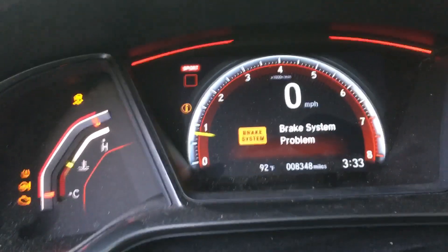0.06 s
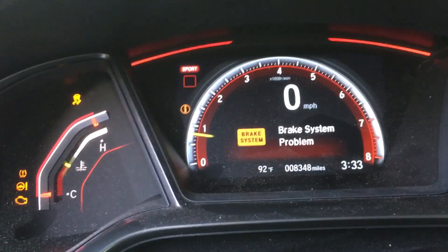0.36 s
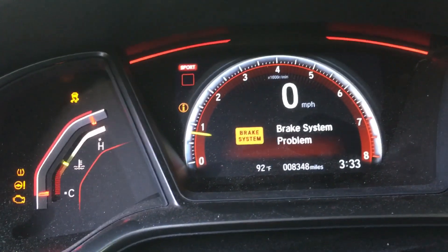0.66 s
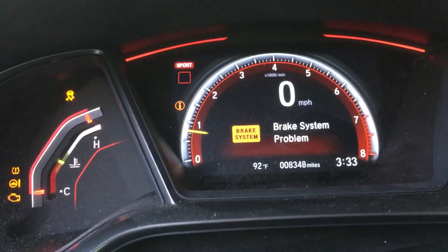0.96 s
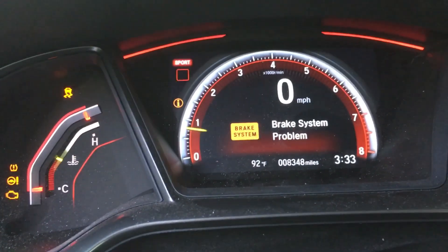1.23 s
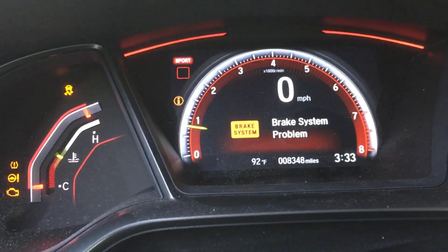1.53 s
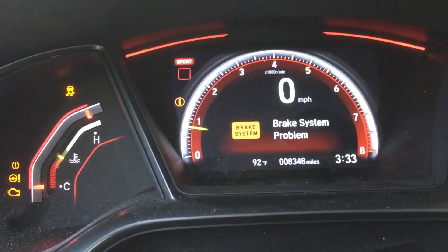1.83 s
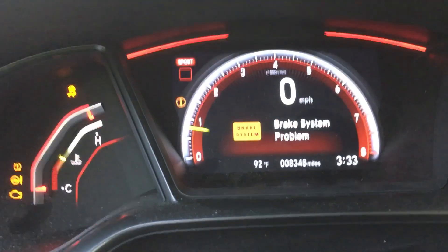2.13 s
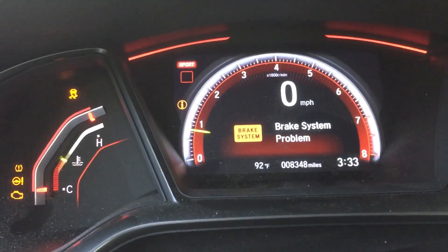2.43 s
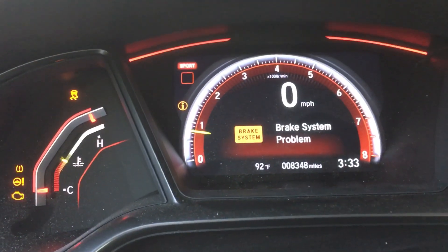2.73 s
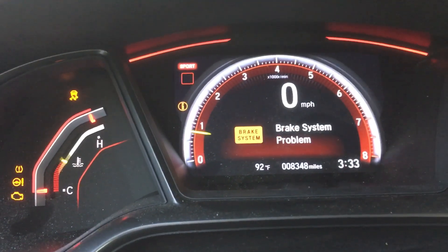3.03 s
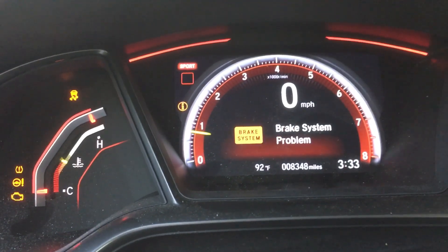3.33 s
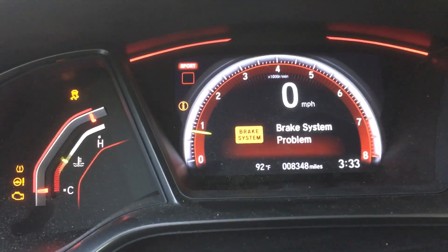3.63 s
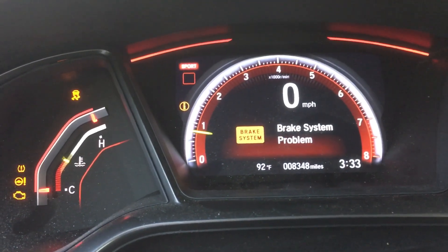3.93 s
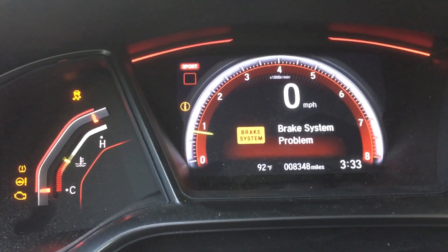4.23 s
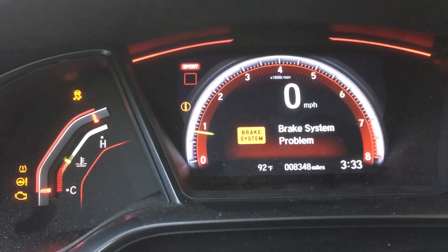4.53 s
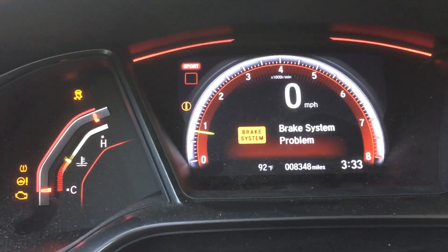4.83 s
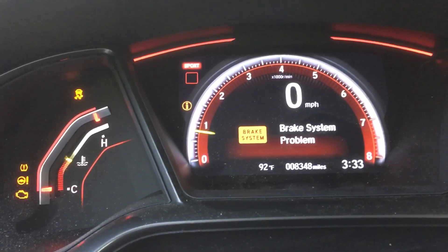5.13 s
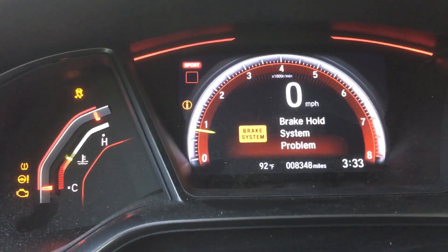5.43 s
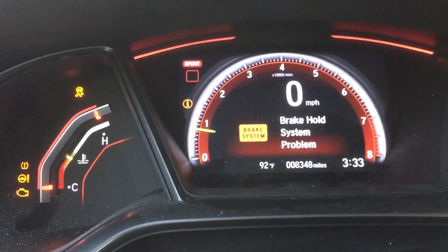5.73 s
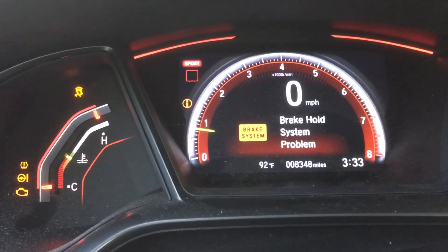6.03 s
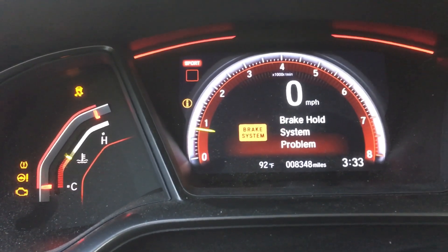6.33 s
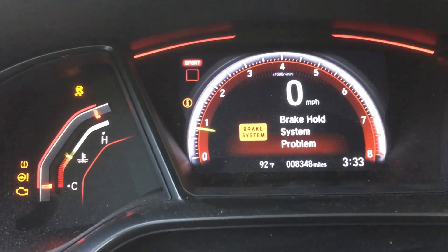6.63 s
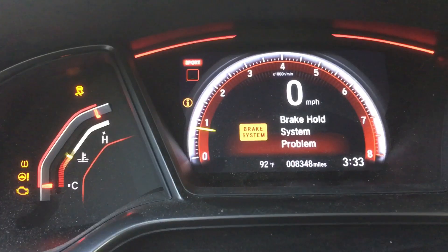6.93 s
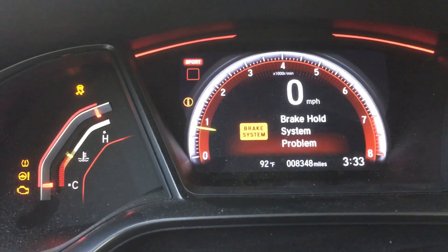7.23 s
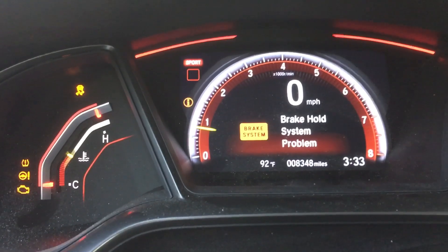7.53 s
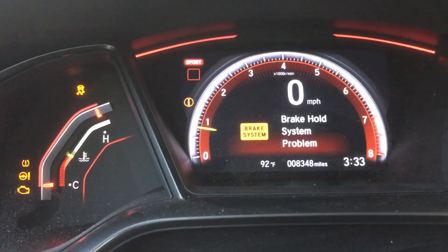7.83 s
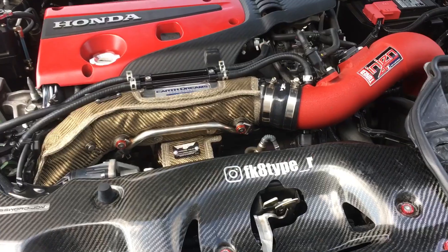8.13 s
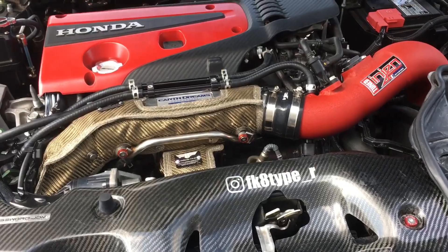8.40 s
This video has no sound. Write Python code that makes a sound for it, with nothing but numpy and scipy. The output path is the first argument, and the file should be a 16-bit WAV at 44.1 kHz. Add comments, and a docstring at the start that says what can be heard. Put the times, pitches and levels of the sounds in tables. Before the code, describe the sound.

A car engine idles with a deep, uneven boom inside the cabin, vents blowing, then briefly clatters and whines under the open hood.

```python
"""Idling car, cabin and engine bay

From the driver's seat, on a phone microphone: a turbocharged four-cylinder idles through a free-flowing
exhaust. Uneven firings boom in the cabin and now and then stumble or burble. The vents blow, and right
at the microphone a sleeve brushes and bumps the phone. For the last moment we stand at the open engine
bay: cooling fan, clatter and injector ticks."""
import sys
import numpy as np
from scipy import signal
from scipy.fft import rfft, irfft
from scipy.io import wavfile

SR = 44100
rng = np.random.default_rng(int(sys.argv[2]) if len(sys.argv) > 2 else 0)


def wrap_up_sound(samples):
    """Save the sound to the file named by the first command line argument, as 16-bit audio."""
    columns = np.atleast_2d(samples).T
    # keep every value between -1 and 1, then stretch to whole-number steps
    tamed = np.clip(columns, -1, 1)
    steps = np.round(tamed * 32767).astype(np.int16)
    wavfile.write(sys.argv[1], SR, steps)


N = 381906
T = np.arange(N) / SR
BUMP_S, BAY_START_S = 2.211, 8.045

# The idle, hunting slightly. Each row: time in seconds, firings per second.
FIRING_RATE = [(0.0, 26.1), (0.4, 25.79), (1.2, 25.82), (2.0, 25.98), (2.4, 25.55), (2.8, 25.95),
               (3.6, 25.97), (4.4, 26.21), (4.8, 25.85), (5.2, 25.93), (5.6, 25.68), (6.0, 26.0),
               (6.8, 25.88), (7.2, 26.14), (8.0, 25.92), (8.3, 26.27), (8.66, 26.01)]
# One firing, from the seat and at the bay. Each row: frequency in Hz, relative level in dB.
CABIN_BOOM_SPECTRUM = [(26, -47), (44, 0.5), (52, 3.5), (66, 9.5), (78, 1.5), (104, -13), (130, -5.5),
                       (156, -14.5), (182, -27), (208, -32.5), (260, -46), (500, -82), (3000, -140)]
BAY_BOOM_SPECTRUM = [(26, -31), (52, -2), (78, -1.5), (104, -5), (130, -9), (156, -12.5), (182, -40),
                     (260, -29), (600, -50), (3000, -110)]
# The exhaust note at the same two spots. Each row: time in seconds, level in dB before stumbles.
CABIN_BOOM_LEVEL = [(0, -15.5), (1.2, -17.5), (1.7, -16), (2.2, -17), (2.95, -16), (3.6, -17.5),
                    (4.05, -16.2), (4.9, -17.5), (6.6, -18), (7.95, -15.5)]
BAY_BOOM_LEVEL = [(8.05, -23.5), (8.17, -24), (8.215, -19), (8.29, -23.5), (8.38, -16.5), (8.47, -21),
                  (8.55, -17.5), (8.66, -25)]
# A charge or two burn weakly. Each row: centre in seconds, loss in dB, length in seconds.
WEAK_BURNS = [(0.0, 5.5, .04), (0.303, 5, 0.057), (0.698, 5, 0.035), (1.125, 2.5, 0.044), (1.332, 3.5, .07),
              (2.185, 3, .07), (2.407, 7, 0.038), (2.573, 8.5, 0.073), (2.715, 3, .04), (3.204, 4, 0.095),
              (3.778, 3.5, .07), (3.917, 4.5, 0.045), (4.602, 5.5, .045), (4.98, 4.5, .04), (5.365, 8, .05),
              (5.45, 2, .04), (6.277, 6.5, 0.058), (7.198, 6.5, 0.064), (7.922, 4, .04)]
# Turbulent gas in the pipe. Each row: frequency in Hz, relative level in dB.
RUMBLE_SPECTRUM = [(18, -19.5), (30, -4), (48, -3), (80, -0.5), (130, -1), (190, -6), (250, -12.5),
                   (330, -20), (450, -26), (900, -40), (3000, -75)]
# Exhaust pops. Each row: time in seconds, relative peak in dB, ring in Hz, silencer gain in dB.
LATE_BURNS = [(0.373, -26.5, 304, 8), (2.586, -27.5, 463, -10), (2.678, -30, 256, 6),
              (2.877, -28.5, 320, -1), (4.972, -29.5, 257, 0), (5.605, -26, 250, -2), (5.7, -27, 250, -3),
              (6.103, -35, 258, 0), (6.464, -31.5, 315, 0), (6.744, -25.5, 250, 4), (6.774, -35, 292, 2)]
# Resonances of the silencer. Each row: frequency in Hz, width in Hz, gain in dB.
SILENCER_MODES = [(216, 73, 7), (460, 260, -5.5)]
# The blower's rush and the hiss at the grilles. Each row: frequency in Hz, relative level in dB.
BLOWER_SPECTRUM = [(150, -1.5), (400, -5), (650, -2), (800, -2.5), (1000, -4.5), (1650, -2.5), (1820, -7.5),
                   (2250, -7.5), (2450, -11), (2680, -21.5), (4000, -60)]
GRILLE_SPECTRUM = [(1500, -25), (2700, -10), (3000, -0.5), (3250, -2.5), (4400, -4), (4950, -9.5),
                   (5300, -8.5), (6600, -10.5), (7700, -15), (8450, -14), (9700, -19.5), (10400, -25),
                   (11200, -23), (15500, -34.5)]
# Resonances of the air ducts. Each row: frequency in Hz, width in Hz, gain in dB.
DUCT_MODES = [(691, 16, -2.5), (1184, 91, 5), (1425, 36, 2.5), (1625, 13, -7.5), (1972, 75, -1)]
# Cloth sliding at the microphone. Each row: frequency in Hz, relative level in dB.
CLOTH_SPECTRUM = [(1000, -30), (2600, -9), (3500, -8), (4900, -2), (5550, 1.5), (6000, -1), (7000, -2.5),
                  (8500, -4), (10500, -16.5), (12000, -17), (15500, -23)]
# Sleeve strokes. Each row: fastest moment in seconds, relative level in dB, rise and fade in seconds.
SLEEVE_STROKES = [(0.0, -56, .05, 0.079), (.79, -55, .13, 0.22), (1.28, -52, 0.26, 0.36),
                  (2.115, -52, 0.027, 0.065), (2.191, -43, 0.026, 0.023), (2.229, -51, .006, 0.009)]
# Resonances of the bumped phone. Each row: frequency in Hz, width in Hz, gain in dB.
PHONE_MODES = [(105, 20, 3), (167, 16, -2), (250, 32, 12.5), (587, 120, -3.5), (675, 70, -14),
               (860, 53, -7)]
# Belts, valves and air at the bay. Each row: frequency in Hz, relative level in dB.
CLATTER_SPECTRUM = [(120, -27.5), (200, -5.5), (330, 0), (482, -10), (1200, -11.5), (2100, -15),
                    (2700, -20.5), (3830, -18.5), (4950, -24.5), (5600, -22.5), (7900, -24), (12200, -28.5),
                    (13000, -37), (15700, -34)]
# Fan and pump tones. Each row: frequency in Hz, typical amplitude in dB.
FAN_AND_PUMP_TONES = [(360, -33), (449.2, -40.5), (718.5, -46.5), (1095, -43.5), (1347, -52), (1389, -48),
                      (3812, -54), (7374, -63), (9778, -66)]
# The fuel rail, rung by the injectors. Each row: frequency in Hz, width in Hz, gain in dB.
RAIL_MODES = [(9100, 600, -10), (9850, 200, -2), (10600, 120, -1), (11300, 170, -7), (11700, 140, 2),
              (11980, 160, 1)]


def exhaust(spectrum, levels, phase, scatter_db, jitter_s):
    """Each firing sends a pressure pulse down the pipe; no two are alike, and stumbles weaken them."""
    times = firing_times(phase)
    scatter, jitter = rng.standard_normal((len(times), 2)).T
    loss_db = sum(db * swell(times, at, length / 2, length / 2) for at, db, length in WEAK_BURNS)
    sizes = undb(curve(levels, times) - loss_db + scatter_db * scatter)
    boom = colour(pulses(times + jitter_s * jitter, sizes), spectrum)
    return level(boom, 0) * np.sqrt(np.mean(sizes ** 2))


def rumble(db, phase, scatter_db, decay_s):
    """Turbulent gas follows every pulse, in gulps of uneven size."""
    times = firing_times(phase)
    sizes = undb(scatter_db * rng.standard_normal(len(times)))
    gulps = noise() * puffs(times, sizes, decay_s)
    return level(colour(gulps, RUMBLE_SPECTRUM), db)


def burbles(gain_db, rise_s, decay_s, width_hz, wall_cutoff_hz):
    """Late-burning charges pop in the silencer and reach the seat muffled by the cabin wall."""
    pops = np.zeros(N)
    for at, db, hz, silencer_db in LATE_BURNS:
        onset = np.clip((T - at) / rise_s + 1, 0, 1)
        flare = onset * np.exp(-np.maximum(T - at, 0) / decay_s)
        gas = noise() * (flare + 1e-18)
        pop = ring(gas, [(hz, width_hz, 0)]) + undb(silencer_db) * ring(gas, SILENCER_MODES)
        pops += undb(db + gain_db) * pop / np.abs(pop).max()
    return lowpass(pops, 3, wall_cutoff_hz)


def clatter(db, flicker_db):
    """Belts and valve gear at the open bay: a wash of noise that flickers fast."""
    wash = noise() * undb(flicker_db * wander(210))
    return level(colour(wash, CLATTER_SPECTRUM), db)


def fan_and_pumps(flutter_db, waver):
    """The cooling fan and pumps whine, each tone unsteady in level and pitch."""
    whine = np.zeros(N)
    for hz, db in FAN_AND_PUMP_TONES:
        amplitude = undb(db + flutter_db * wander(40))
        cycles = hz * np.cumsum(1 + waver * wander(30)) / SR
        whine += amplitude * np.sin(2 * np.pi * cycles)
    return whine


def injectors(db, phase, open_s, decay_s):
    """At each firing an injector ticks open, then more softly shut, and rings the fuel rail."""
    times = firing_times(phase)
    sizes = undb(1.9 * rng.standard_normal(len(times)))
    ticks = puffs(times, sizes, decay_s) + puffs(times + open_s, 0.46 * sizes, decay_s)
    return level(ring(noise() * ticks, RAIL_MODES), db)


def sleeve_rub(grain_db, rasp_gain_db, drag_db):
    """Right at the microphone, the fibres of a sleeve catch and slip on the phone."""
    fibres = noise() * undb(grain_db * wander(200))
    strokes = [undb(db) * swell(T, at, rise, fade) for at, db, rise, fade in SLEEVE_STROKES]
    speed = np.sqrt(sum(stroke ** 2 for stroke in strokes))
    pressure = speed / speed.max()
    slide = level(colour(fibres, CLOTH_SPECTRUM), 0)
    # cloth pressed hard rasps lower, and its drag rumbles through the case
    rasp = level(ring(fibres, [(3700, 970, 0)]), rasp_gain_db) * pressure
    case_mode = [(306, 110, 0)]
    drag = level(ring(ring(fibres, case_mode), case_mode), drag_db) * np.sqrt(pressure)
    return (slide + rasp) * speed + drag


def phone_bump(peak_db, contact_s, scuff, rebound):
    """The sleeve's last quick sweep knocks the phone: a soft double bump that rings its body."""
    times = BUMP_S + np.array([0, 0.0045])
    sizes = [1.0, rebound]
    blows = pulses(times, sizes) + scuff * noise() * puffs(times, sizes, contact_s)
    thud = lowpass(ring(blows, PHONE_MODES), 2, 1000)
    return undb(peak_db) * thud / np.abs(thud).max()


def vents(blower_db, hiss_db, flutter_db):
    """The cabin's background: the blower rushes, the ducts ring with a wavering note, the grilles hiss."""
    air = noise()
    ducts = ring(air, DUCT_MODES) * undb(flutter_db * wander(12))
    rush = level(colour(air + ducts, BLOWER_SPECTRUM), blower_db)
    hiss = level(colour(noise(), GRILLE_SPECTRUM), hiss_db)
    return rush + hiss


def firing_times(phase):
    """Times at which the engine passes a given share (0 to 1) of each firing cycle."""
    cycles = np.cumsum(curve(FIRING_RATE, T)) / SR
    return np.interp(np.arange(int(cycles[-1] - phase) + 1) + phase, cycles, T)


def pulses(times, sizes):
    """One impulse at each time."""
    return np.bincount(np.clip(times * SR, 0, N).astype(int), sizes, N + 1)[:N]


def puffs(times, sizes, decay_s):
    """An envelope that jumps at each time and dies away."""
    return signal.lfilter([1], [1, -np.exp(-1 / (decay_s * SR))], pulses(times, sizes))


def swell(t, at, rise_s, fall_s):
    """A smooth hump that reaches 1 at the given time."""
    return np.exp(-((t - at) / np.where(t < at, rise_s, fall_s)) ** 2)


def curve(rows, times):
    """Join (seconds, value) rows by straight lines."""
    return np.interp(times, *np.transpose(rows))


def noise():
    """White noise for the whole scene."""
    return rng.standard_normal(N)


def wander(turns_per_s):
    """Random drift with a spread near 1."""
    knots = rng.standard_normal(2000)
    return 1.09 * np.interp(T * turns_per_s, np.arange(len(knots)), knots)


def colour(x, spectrum, size=32768):
    """Causal filter with the given (Hz, dB) response, built from its cepstrum."""
    hz, db = np.transpose(spectrum)
    freqs = np.maximum(np.fft.rfftfreq(size, 1 / SR), 1)
    gains = undb(np.interp(np.log(freqs), np.log(hz), db))
    cepstrum = irfft(np.log(gains))
    # fold onto positive time for minimum phase
    cepstrum[1:size // 2] *= 2
    cepstrum[size // 2 + 1:] = 0
    impulse_response = irfft(np.exp(rfft(cepstrum)))
    return signal.fftconvolve(x, impulse_response)[:N]


def ring(x, modes):
    """Sum of resonances (Hz, width in Hz, dB)."""
    return sum(undb(db) * signal.lfilter(*signal.iirpeak(hz, hz / width, fs=SR), x)
               for hz, width, db in modes)


def lowpass(x, order, cutoff_hz):
    """Dull the sound above the cutoff."""
    return signal.sosfilt(signal.butter(order, cutoff_hz, fs=SR, output="sos"), x)


def level(x, db):
    """Scale to an rms level."""
    return x * undb(db) / np.sqrt(np.mean(x ** 2))


def undb(db):
    """Decibels to gain."""
    return 10 ** (np.asarray(db) / 20)


def scene():
    """The microphone at the driver's seat, then a straight cut to the open engine bay."""
    # the body panels pass the exhaust pulse into the cabin upside down
    cabin = -exhaust(CABIN_BOOM_SPECTRUM, CABIN_BOOM_LEVEL, phase=0.058, scatter_db=0.93, jitter_s=3e-4)
    cabin += rumble(db=-29, phase=0.27, scatter_db=3.5, decay_s=0.062)
    cabin += burbles(gain_db=7, rise_s=0.0056, decay_s=0.0068, width_hz=110, wall_cutoff_hz=527)
    cabin += vents(blower_db=-39, hiss_db=-51.5, flutter_db=1.5)
    cabin += sleeve_rub(grain_db=1.5, rasp_gain_db=4, drag_db=-42.5)
    cabin += phone_bump(peak_db=-15, contact_s=0.0065, scuff=0.038, rebound=0.58)
    bay = exhaust(BAY_BOOM_SPECTRUM, BAY_BOOM_LEVEL, phase=0.93, scatter_db=1, jitter_s=2e-4)
    bay += rumble(db=-30, phase=0.93, scatter_db=6, decay_s=0.056)
    bay += clatter(db=-28, flicker_db=1)
    bay += fan_and_pumps(flutter_db=2.9, waver=0.00193)
    bay += injectors(db=-41.5, phase=0.62, open_s=0.0036, decay_s=0.0029)
    return np.where(T < BAY_START_S, cabin, bay)[None]


def record(dry):
    """The phone cuts the treble above 15750 Hz."""
    return signal.sosfilt(signal.ellip(10, 0.2, 80, 15750, fs=SR, output="sos"), dry)


dry = scene()
out = record(dry)
wrap_up_sound(out)
```